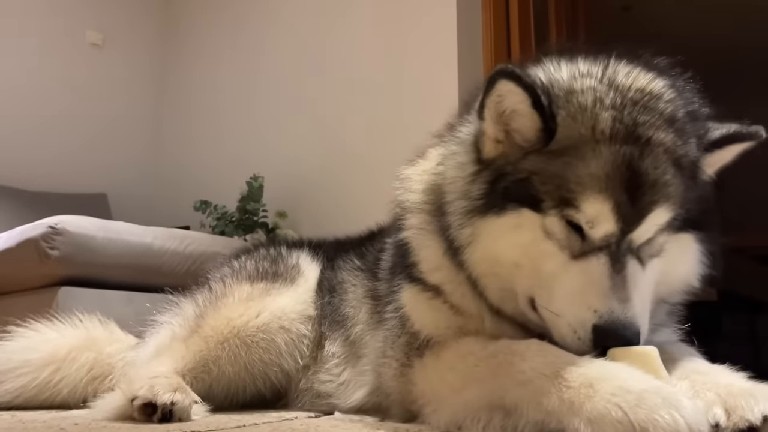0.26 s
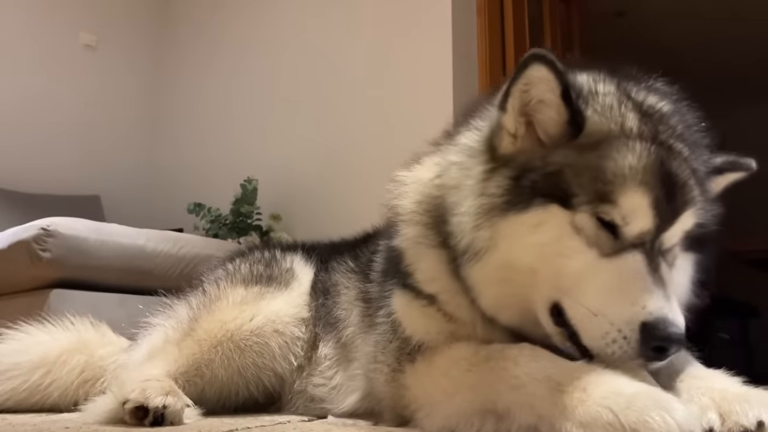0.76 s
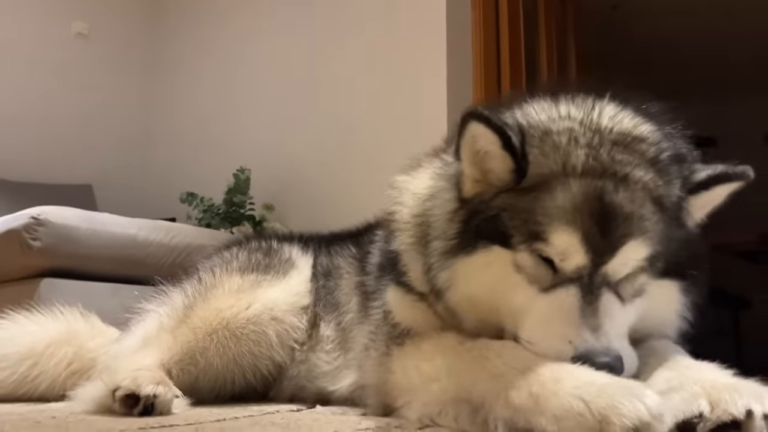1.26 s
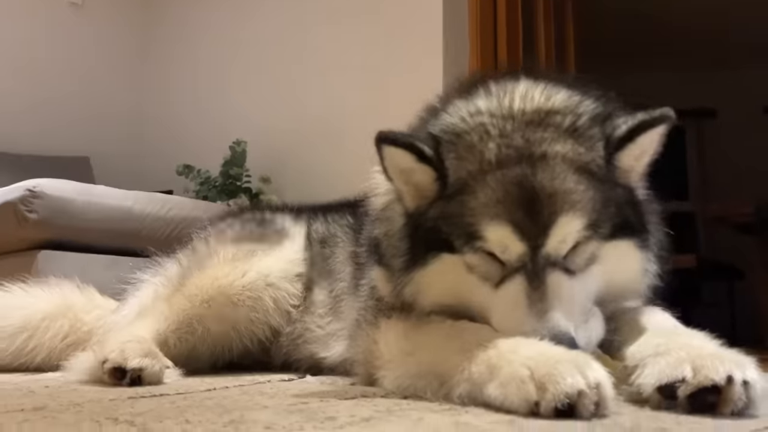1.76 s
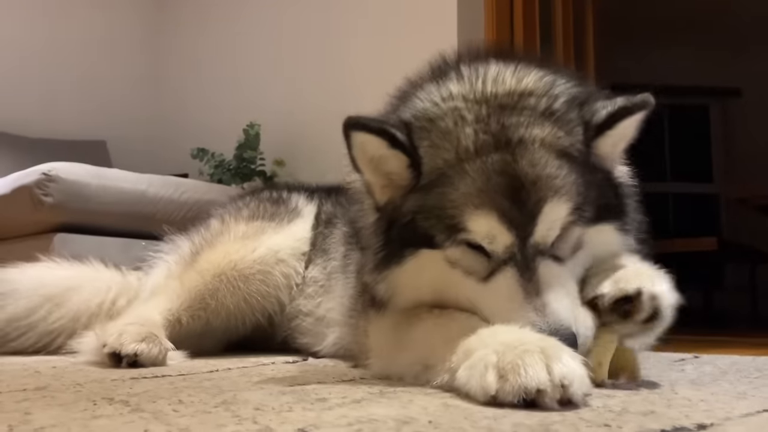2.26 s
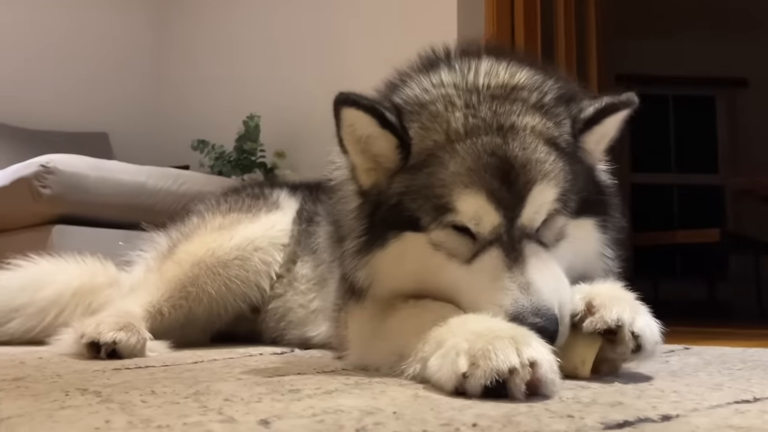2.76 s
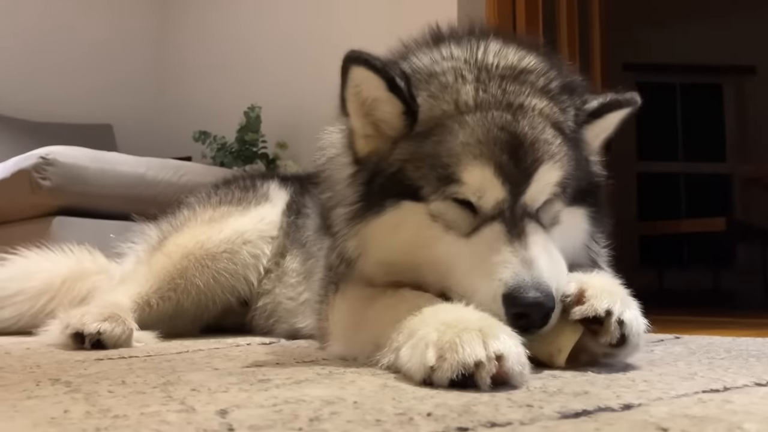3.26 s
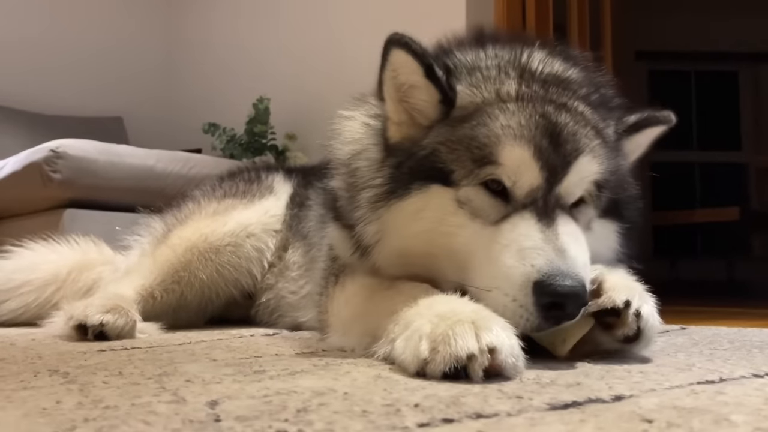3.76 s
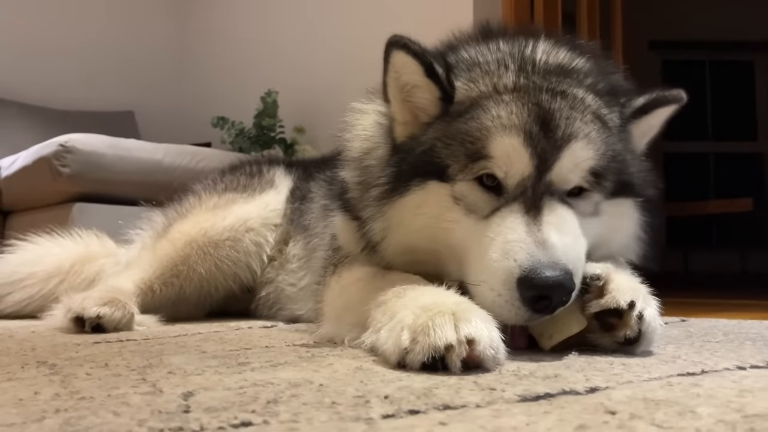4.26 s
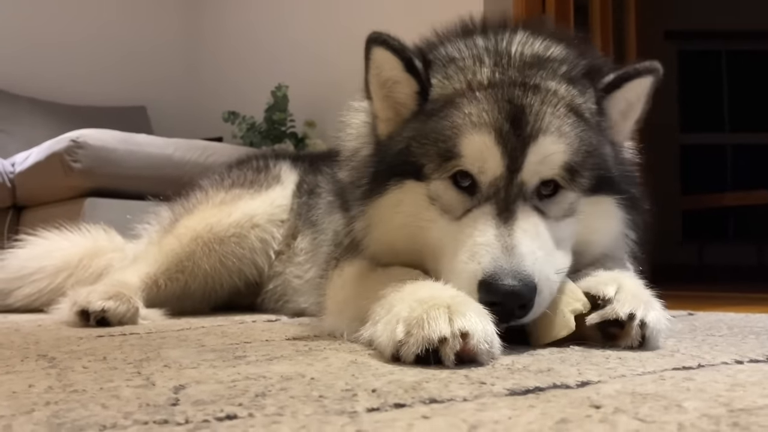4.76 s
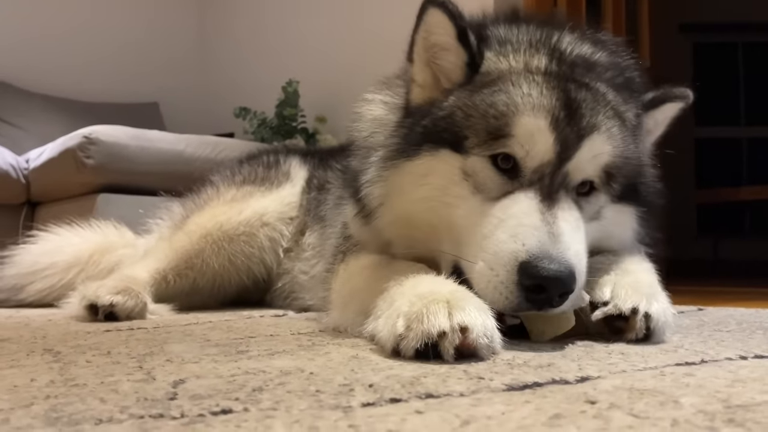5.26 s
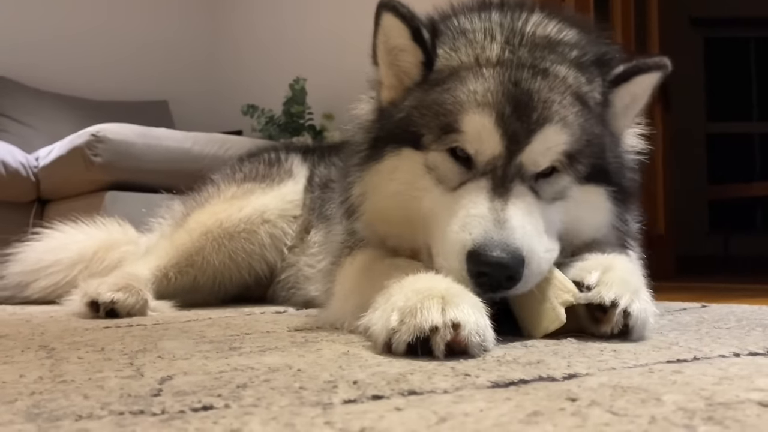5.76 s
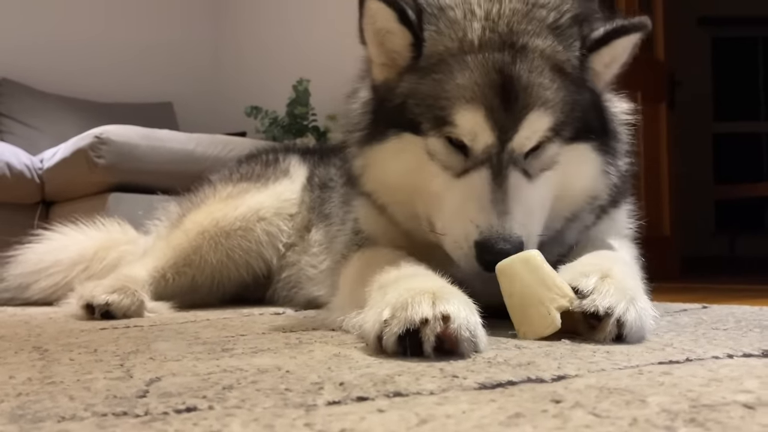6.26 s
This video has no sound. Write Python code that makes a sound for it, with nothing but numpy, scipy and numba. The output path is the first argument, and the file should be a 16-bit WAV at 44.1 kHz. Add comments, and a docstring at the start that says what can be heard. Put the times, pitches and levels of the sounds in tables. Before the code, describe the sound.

Close stereo pickup of a big dog working a hard chew on a rug in a quiet room. A tooth skids with a tiny squeak, then soft licking hiss, muzzle shuffles, small knocks and wet clicks; the chew clacks on the floor. Later two hard, sudden crunches with low floor thumps ring briefly in the room.

```python
"""A large dog lies on a rug in a quiet living room and gnaws a hard chew held between its paws.
Over faint room air (noise), tongue and fur hiss and muzzle and paws shuffle (random tiny slips).
Early on a tooth skids with a rising squeak and rasps; then come knocks (short decaying sines), wet clicks
and splinter snaps (noise bursts) and humming drags (tuned slips); near 2.07 s the chew drops on the floor.
Near 4.5 s and 5.4 s quick knocks make a crunch, the floor thumps, and the room echoes on."""
import sys
import numpy as np
from scipy import signal
from scipy.fft import rfft, irfft, next_fast_len
from scipy.io import wavfile
from scipy.ndimage import uniform_filter1d
from numba import njit

SR = 44100
rng = np.random.default_rng(int(sys.argv[2]) if len(sys.argv) > 2 else 0)


def transcribe(u):
    """Save the signal u as a 16-bit wav file named by the first command-line argument.

    u: samples, shape (n,) or (channels, n), limited to [-1, 1]; the rate is SR.
    q: integer samples, one column per channel.
    """
    v = np.clip(np.atleast_2d(u).T, -1, 1)
    q = np.round(v * 32767).astype(np.int16)
    wavfile.write(sys.argv[1], SR, q)


N = 286632
TIME = np.arange(N) / SR

# Still room air. Each row: frequency in Hz, level in dB.
AIR_COLOUR = [(30, 9.5), (120, 10.5), (250, 9.5), (700, 0), (1500, -18.5), (4000, -12), (8500, -15.5),
              (12500, -36.5)]
AIR_DB = -79
# Scattered sound that differs between the channels. Each row: frequency in Hz, side minus mid in dB.
WIDTH = [(60, -10), (300, -10), (1000, -1.5), (2000, -3.5), (4500, -4), (7000, -6.5), (8500, -19.5),
         (10000, 13), (11500, -7)]

# Strokes of the mouth over the chew; tongue and fur hiss, muzzle and paws shuffle more dully.
# Each row: start of the hold in seconds, hold in seconds, hiss level in dB, shuffle level in dB.
STROKES = [ (0, 0.096, -67.5, -66), (0.543, .08, -80.5, -82.5), (0.714, 0.037, -74.5, -73.5),
           (0.976, 0.064, -71, -70), (1.182, 0.13, -60, -67.5), (1.555, 0.2, -61.5, -68),
           (1.726, 0.59, -60, -64), (2.515, .47, -59.5, -70), (3.092, 0.28, -60.5, -71.5),
           (3.46, 0.075, -67, -68), (3.786, 0.17, -62, -74), (4.03, 0.13, -57, -67.5),
           (4.28, 0.054, -65, -70.5), (4.538, 0.036, -58, -68), (4.716, 0.11, -65.5, -60.5),
           (5.21, 0.1, -65, -61.5), (5.416, 0.053, -59.5, -59.5), (5.638, 0.38, -67, -65),
           (6.145, 0.057, -66.5, -70), (6.416, 0.081, -62, -80)]
STROKE_RISE_S, STROKE_FALL_S = 0.077, 0.11  # time constants
REST_HISS_DB, REST_SHUFFLE_DB = -91, -90.5  # the mouth at rest
# Tone of the hiss. Each row: frequency in Hz, level in dB.
RUB_COLOUR = [(60, -0.5), (200, -6.5), (350, -12), (650, -4.5), (1100, -3.5), (1700, 1.5), (2400, -4.5),
              (3300, -6.5), (4300, -4.5), (6800, -7.5), (7600, -4), (8400, 1.5), (9600, -3), (11300, -0.5),
              (12500, -53)]
# Tone of the shuffle. Each row: frequency in Hz, level in dB.
SHUFFLE_COLOUR = [(40, -6.5), (90, 1), (250, 5), (750, 7), (1400, -3), (2100, -11), (3200, -50),
                  (7000, -30)]

# A tooth skids along the chew: the squeak has SKID_HZ at SKID_S and rises steadily within its range.
SKID_S, SKID_HZ, SKID_RISE_HZ_PER_S, SKID_RANGE_HZ = 0.1178, 1104, 22200, (720, 1930)
SKID_DB = -42  # before the contact gain in scene()
SKID_ATTACK_S, SKID_HOLD_S, SKID_FADE_S = 0.0051, 0.007, 0.015

# Dry rasps of teeth dragged over the chew, building until the tooth slips off.
# Each row: time of the slip in seconds, build time in seconds, level in dB before the contact gain.
RASPS = [(.205, 0.13, -54), (.725, 0.018, -62)]
RASP_RELEASE_S = 0.021
# Tone of the rasp. Each row: frequency in Hz, level in dB.
RASP_COLOUR = [(200, -2), (700, 0.5), (1400, 0), (2100, -3.5), (2500, -11), (3000, -8.5), (3600, -33),
               (8000, -36)]

# Knocks of teeth on the chew, and of the chew dropped on the floor near 2.07 s; a crunch is a quick run.
# Each row: start in seconds, peak of the ringing in dB before the contact gain,
# pitch in Hz, ring time in seconds, crumbling grit in dB relative to that peak.
KNOCKS = [ (.7303, -41.5, 750, 0.0014, -9), (.7325, -44.5, 1904, 0.0099, -3.5),
          (.965, -48.5, 583, 0.0024, -17), (1.1256, -47, 845, 0.0036, -23), (1.3842, -35, 700, 0.0058, -24),
          (1.7022, -44.5, 604, 0.0038, -6.5), (2.0727, -30.5, 596, 0.0066, -32),
          (2.0738, -31.5, 785, 0.009, -33), (2.0742, -34, 261.6, 0.016, -26),
          (2.1465, -42.5, 700, 0.0037, -30), (2.151, -37.5, 333, 0.0049, -39),
          (2.989, -37, 670, 0.011, -38), (3.1269, -40.5, 644, 0.006, -25), (3.4738, -43, 846, 0.026, -31),
          (3.7508, -36.5, 710, 0.002, -22), (3.9966, -46.5, 780, .0022, -18),
          (4.059, -47.5, 780, 0.0045, -11), (4.1762, -51, 665, .0036, -17.5),
          (4.4135, -41, 856, 0.0036, -13.5), (4.528, -15, 900, 0.00084, -15.5),
          (4.5325, -10, 712, 0.0022, -40), (4.5418, -15.5, 890, 0.0069, -37.5),
          (4.5465, -16, 488, 0.0034, -27), (4.5525, -27.5, 514, 0.0044, -33),
          (4.562, -26.5, 737, 0.0066, -33), (4.9809, -24.5, 877, 0.0014, -43.5),
          (5.114, -45, 370, 0.0054, -15), (5.204, -24.5, 635, 0.0083, -17), (5.2085, -30, 398, 0.0054, -23),
          (5.2132, -27, 853, 0.0036, -22.5), (5.409, -26.5, 915, 0.033, -16.5),
          (5.4183, -10.5, 937, 0.0059, -19.5), (5.4305, -9, 648, 0.0018, -17),
          (5.4345, -16, 426, 0.0039, -35.5), (5.4351, -20.5, 1196, .0033, -38)]
# What each knock rings with. Each row: multiple of the pitch, level in dB, share of the ring time.
CHEW_MODES = [(1, 3.5, 0.74), (.62, -11.5, 0.94), (1.36, -14, 0.85), (1.85, -13.5, 0.14),
              (2.9, -41.5, 0.55)]
# Tone of the crumbling grit. Each row: frequency in Hz, level in dB.
GRIT_COLOUR = [(150, 1), (900, -1), (1500, 3), (2000, -7.5), (2500, -12), (3300, -26.5), (5000, -38),
               (12000, -21.5)]
# Light nibbles at random moments, louder while the mouth works, each a small knock.
# NIBBLE_DB is relative to the stroke gain; level and pitch then scatter.
NIBBLES_PER_S, NIBBLE_DB, NIBBLE_HZ, NIBBLE_RING_S, NIBBLE_GRIT_DB = 3, 1, 695, 0.0039, -18.5

# Splinters snapping and wet clicks of the lips.
# Each row: start in seconds, peak in dB before the gain in snaps(), centre in Hz.
SNAPS = [ (.7323, -37, 9700), (0.771, -44, 2830), (1.8975, -40.5, 4480), (1.9803, -41.5, 9000),
         (2.291, -38, 9500), (2.7721, -46, 7540), (4.0273, -40.5, 4620), (4.2389, -30.5, 10500),
         (4.5311, -27.5, 7850), (4.5322, -32, 2200), (4.7222, -39.5, 7200), (4.9784, -48, 8900),
         (5.1995, -42, 8600), (5.4185, -39.5, 2900), (5.4204, -28, 8900), (5.43, -32, 8200),
         (5.5705, -37.5, 8500), (5.612, -41, 8350)]
# Fainter wet clicks at random moments; CLICK_DB is relative to the stroke gain, before the same gain.
CLICKS_PER_S, CLICK_DB, CLICK_HZ = 3, 14.5, 9000

# The tooth drags on the chew and keeps it humming.
# Each row: start in seconds, fade time in seconds, first pitch in Hz, last pitch in Hz,
# width of the resonance in Hz, level in dB before its envelope and the contact gain.
DRAGS = [(.775, 0.048, 2700, 2980, 1400, -70), (1.39, 0.15, 723, 746, 154, -62),
         (1.96, 0.12, 800, 730, 200, -61), (2.09, 0.15, 330, 248, 110, -55),
         (3.0, 0.072, 690, 664, 70, -67), (3.135, 0.14, 644, 674, 110, -70.5),
         (3.459, 0.023, 835, 855, 537, -58.5), (3.585, 0.052, 790, 740, 540, -59.5)]

# Low thumps of the floor under hard bites and under the dropped chew.
# Each row: start in seconds, peak in dB before the contact gain.
THUMPS = [(2.078, -72), (4.546, -42.5), (5.207, -48.5), (5.434, -29.5)]
# Ringing of the floor. Each row: frequency in Hz, level in dB, time to fall by 60 dB in seconds.
FLOOR_MODES = [(66, 4, 0.065), (86.6, -1, 0.16), (115, -0.5, 0.12), (161, -3.5, 0.22), (190, -7, 0.29),
               (277.3, 0.5, 0.11), (420.7, -3, 0.18)]

# The room's tail. Each row: frequency in Hz, level in dB, time to fall by 60 dB in seconds.
ROOM_TAIL = [(59, 7.5, 1.0), (150, 8, 0.91), (399, 7, 0.91), (755, -3, 0.88), (1500, -3, 0.65),
             (3000, -3, 1.5), (8000, -1.5, .6), (14000, -14, .4)]
# Standing waves. Each row: frequency in Hz before scatter, level in dB, time to fall by 60 dB in seconds.
ROOM_MODES = [(276, -2.5, 0.33), (320, -1, 1), (368, 1, 1.5), (415, 0, 1.2), (522, -8, .86), (652, -4, 1.8),
              (673, -1, 0.96), (723, -5.5, 0.67), (840, -9, .6), (914, 0, 0.95), (990, -1.5, 0.8),
              (1200, -7, .7)]
TOP_HZ = 12000  # the top is cut above this


def undb(db):
    """Decibels to gain."""
    return 10 ** (np.asarray(db) / 20)


def unit(x):
    """Scale to an rms of 1."""
    return x / np.sqrt(np.mean(x ** 2))


def colour(x, points):
    """Filter by a spectrum of (Hz, dB) points, and thin the bass below half the first frequency."""
    hz, db = np.transpose(points)
    size = next_fast_len(len(x), True)
    f = np.maximum(np.fft.rfftfreq(size, 1 / SR), 1)
    low_cut = 1 / np.sqrt(1 + (hz[0] / 2 / f) ** 4)
    gain = undb(np.interp(np.log(f), np.log(hz), db)) * low_cut
    return irfft(rfft(x, size) * gain, size)[:len(x)]


def add(track, s, sound):
    """Mix a sound into a track at time s."""
    i = int(s * SR)
    track[i:i + len(sound)] += sound[:N - i]


def ring(modes, t):
    """Decaying sines from rows of (Hz, dB, seconds to fall by 60 dB)."""
    return sum(undb(db - 60 * t / t60) * np.sin(2 * np.pi * hz * t) for hz, db, t60 in modes)


def walk(rate):
    """Random levels, about `rate` new ones a second, smoothed twice and scaled to an rms of 1."""
    k = int(SR / rate)
    steps = np.repeat(rng.standard_normal(N // k + 1), k)
    smooth = uniform_filter1d(uniform_filter1d(steps, k), k)
    return unit(smooth[:N])


def spread(x):
    """Scattered sound, opposite in the two channels."""
    return colour(x, WIDTH) * np.array([[1], [-1]])


def stereo(mid, side):
    """Left and right: a shared sound plus a scattered one."""
    return mid + spread(side)


def ports(x, lag_s, pan_db):
    """A close source reaches the right microphone a moment after the left; positive pan favours left."""
    taps = np.arange(-12, 13) - lag_s * SR
    # a windowed sinc delays by a fraction of a sample
    late = np.convolve(x, np.sinc(taps) * np.exp(-(taps / 5) ** 2), "same")
    return np.array([x * undb(pan_db / 2), late * undb(-pan_db / 2)])


@njit
def resonate(x, hz, width):
    """State-variable band-pass whose centre may move."""
    y, b, l = np.empty(len(x)), 0., 0.
    for i in range(len(x)):
        g, k = np.tan(np.pi * hz[i] / SR), width / hz[i]
        v = (b + g * (x[i] - l)) / (1 + g * (g + k))
        b, l, y[i] = 2 * v - b, l + 2 * g * v, k * v
    return y


def grains(per_s, spread_db):
    """Tiny slips at random moments, a few much larger than the rest."""
    chance, size = rng.random(N), rng.standard_normal(N)
    slips, hit = np.zeros(N), chance < per_s / SR
    slips[hit] = np.sign(size[hit]) * undb(spread_db * np.minimum(size[hit] ** 2, 5))
    return unit(slips)


def swell(start_s, hold_s, rise_s, fall_s):
    """Exponential rise up to the start, a hold, an exponential fall."""
    before = np.maximum(start_s - TIME, 0)
    after = np.maximum(TIME - start_s - hold_s, 0)
    return np.exp(-before / rise_s - after / fall_s)


def effort(axis, rest_db):
    """Gain of a friction sound over time: the strokes, at the levels in one column, over a resting level."""
    power = undb(rest_db) ** 2
    for row in STROKES:
        stroke = undb(row[axis]) * swell(row[0], row[1], STROKE_RISE_S, STROKE_FALL_S)
        power = power + stroke ** 2
    return np.sqrt(power)


def chance_events(per_s, press, db, hz, scatter_db=3.0, detune=0.09):
    """Rows of (s, dB, Hz) at random moments, as strong as the mouth is pressing, give or take a scatter."""
    draws = rng.random((64, 3))[:int(per_s * N / SR)]
    events = []
    for when, size, pitch in draws:
        press_db = 20 * np.log10(press[int(when * N)])
        level_db = db + press_db + scatter_db * (2 * size - 1)
        events.append((when * N / SR, level_db, hz * (1 + detune * (2 * pitch - 1))))
    return events


def air():
    """The faint steady hush of the room: coloured noise."""
    mid, side = (unit(colour(rng.standard_normal(N), AIR_COLOUR)) for _ in range(2))
    return undb(AIR_DB) * stereo(mid, side)


def rubbing(press, flicker_db=1.08, waver_db=-0.24, lag_s=.000018):
    """Hairs and tongue catch and release in a dense, fine crackle."""
    near, scattered = (unit(colour(grains(9000, 3.03), RUB_COLOUR)) for _ in range(2))
    hiss = ports(near, lag_s, pan_db=-0.3) + spread(scattered)
    return hiss * press * undb(flicker_db * walk(60) + waver_db * walk(12))


def shuffling(flicker_db=-0.6, waver_db=3.84):
    """Soft, uneven friction of muzzle and paws."""
    mid, side = (unit(colour(grains(4000, 1.2), SHUFFLE_COLOUR)) for _ in range(2))
    level = effort(axis=3, rest_db=REST_SHUFFLE_DB)
    return stereo(mid, side) * level * undb(flicker_db * walk(45) + waver_db * walk(12))


def skid(width_hz=300.0, rough_db=3):
    """Stick-slip pulses through a resonance that rises as the tooth slides."""
    slips = grains(2400, 1.3)
    hz = np.clip(SKID_HZ + SKID_RISE_HZ_PER_S * (TIME - SKID_S), *SKID_RANGE_HZ)
    squeak = unit(resonate(resonate(slips, hz, width_hz), hz, width_hz))
    squeak = squeak * undb(rough_db * walk(300))  # an uneven level
    return squeak * undb(SKID_DB) * swell(SKID_S, SKID_HOLD_S, SKID_ATTACK_S, SKID_FADE_S)


def rasps():
    """Dense dry slips of dragged teeth, swelling until the tooth lets go."""
    rasp = unit(colour(grains(5000, 1.5), RASP_COLOUR))
    scrape = sum(undb(db) * swell(s, 0, build_s, RASP_RELEASE_S) for s, build_s, db in RASPS)
    return rasp * scrape


def knocks(press, contact_s=0.0012, scatter=0.073, grit_s=0.0056, creak_s=0.012, creak_db=-36):
    """Each knock builds over the contact time and rings briefly, with a burst of grit."""
    out, t = np.zeros(N), TIME[:SR // 8]
    onset = 1 - np.exp(-(t / contact_s) ** 2)
    lead = int(creak_s * SR)
    crumbs = unit(colour(grains(4000, 1.4), GRIT_COLOUR))
    events = chance_events(NIBBLES_PER_S, press, NIBBLE_DB, NIBBLE_HZ)
    nibbles = [(*row, NIBBLE_RING_S, NIBBLE_GRIT_DB) for row in events]
    for s, db, hz, ring_s, grit_db in KNOCKS + nibbles:
        # all modes but the first are detuned at random for every knock
        weaker = np.arange(len(CHEW_MODES)) > 0
        detune = 1 + scatter * rng.standard_normal(len(CHEW_MODES)) * weaker
        body = sum(undb(mode_db) * np.exp(-t / (ring_s * share)) * np.sin(2 * np.pi * hz * ratio * d * t)
                   for (ratio, mode_db, share), d in zip(CHEW_MODES, detune))
        body = -onset * body / np.abs(onset * body).max()
        # each knock takes its own stretch of crumbling
        grit = undb(grit_db) * np.roll(crumbs, -int(s * SR))[:len(t)] * np.exp(-t / grit_s)
        add(out, s, undb(db) * (body + grit))
        # a faint creak leads up to the knock
        creak = np.roll(crumbs, int(s * SR))[:lead] * np.linspace(0, 1, lead) ** 2
        add(out, max(s - creak_s, 0), undb(db + creak_db) * creak)
    return out


def snaps(press, fade_s=0.0014, relative_width=0.28, gain_db=-3):
    """Sharp cracks about a millisecond long: noise bursts, each with its own centre frequency."""
    out, t = np.zeros(N), TIME[:SR // 50]
    for s, db, hz in SNAPS + chance_events(CLICKS_PER_S, press, CLICK_DB, CLICK_HZ):
        burst = rng.standard_normal(len(t)) * np.exp(-t / fade_s)
        crack = resonate(burst, np.full(len(t), float(hz)), float(hz * relative_width))
        add(out, s, undb(db + gain_db) * crack / np.abs(crack).max())
    return out


def drags(attack_s=0.0044):
    """Fine friction rings one resonance, which shifts as the grip slackens."""
    out, t = np.zeros(N), TIME[:SR // 2]
    slips = grains(4000, 1.4)
    for s, fade_s, first_hz, last_hz, width_hz, db in DRAGS:
        hz = last_hz + (first_hz - last_hz) * np.exp(-t / fade_s)
        friction = slips[int(s * SR):][:len(t)]
        hum = resonate(resonate(friction, hz, float(width_hz)), hz, float(width_hz))
        envelope = (1 - np.exp(-t / attack_s)) * np.exp(-(t / fade_s) ** 2 / 2)
        add(out, s, undb(db) * unit(hum) * envelope)
    return out


def thumps(push_s=0.003):
    """The floor answers hard bites and the dropped chew with low decaying sines."""
    out, t = np.zeros(N), TIME[:SR // 2]
    boom = ring(FLOOR_MODES, t) * (1 - np.exp(-t / push_s))
    for s, db in THUMPS:
        add(out, s, undb(db) * boom / np.abs(boom).max())
    return out


def reflections(t, early_db=9, early_s=0.017, gap_s=0.001):
    """Dense echoes: a quick cluster from floor and furniture, then a long tail from the walls."""
    hz, db, t60 = np.transpose(ROOM_TAIL)
    f = np.log(np.maximum(np.fft.rfftfreq(len(t), 1 / SR), 1))
    noise = rfft(rng.standard_normal(len(t)))
    tail = 0
    # overlapping bands of noise, each fading at its own pace
    for band, level_db, decay in zip(np.eye(len(hz)), db, t60):
        band_noise = irfft(noise * np.interp(f, np.log(hz), band), len(t))
        tail = tail + band_noise * undb(level_db - 60 * t / decay)
    early = 1 + undb(early_db) * np.exp(-t / early_s)
    return tail * early * (1 - np.exp(-(t / gap_s) ** 2))


def room(x, tail_db=-50.0, modes_db=-77, cluster=0.01192, count=3):
    """Diffuse echoes and standing waves, which come in close clusters that beat as they fade."""
    t = TIME[:2 * SR]
    waves = np.zeros(len(t))
    for hz, db, t60 in ROOM_MODES:
        for _ in range(count):
            near_hz = hz * (1 + cluster * rng.standard_normal())
            waves += rng.choice([-1, 1]) * ring([(near_hz, db, t60)], t)
    response = undb(tail_db) * stereo(reflections(t), reflections(t)) + undb(modes_db) * waves
    return signal.fftconvolve(x[None], response)[:, :N]


def scene(contact_db=-1.6):
    """The dog is close to the microphones; contacts and cracks also fill the room."""
    press = effort(axis=2, rest_db=REST_HISS_DB)
    background = air() + rubbing(press) + shuffling()
    contacts = undb(contact_db) * (skid() + rasps() + knocks(press) + drags() + thumps())
    cracks = snaps(press)
    # contacts are slightly louder on the right, though they reach it slightly later
    direct = ports(contacts, lag_s=.00005, pan_db=-0.9) + ports(cracks, lag_s=.00002, pan_db=0.0)
    return background + direct + room(contacts + cracks)


def record(dry, notch_hz=10300, notch_q=12, low_cut_hz=52):
    """The microphone thins the deepest bass, has a narrow dip in the treble, and the top is cut."""
    thinned = signal.sosfilt(signal.butter(2, low_cut_hz, "high", fs=SR, output="sos"), dry)
    dipped = signal.lfilter(*signal.iirnotch(notch_hz, notch_q, fs=SR), thinned)
    return signal.sosfilt(signal.ellip(8, .2, 70, TOP_HZ, fs=SR, output="sos"), dipped)


dry = scene()
out = record(dry)
transcribe(out)
```